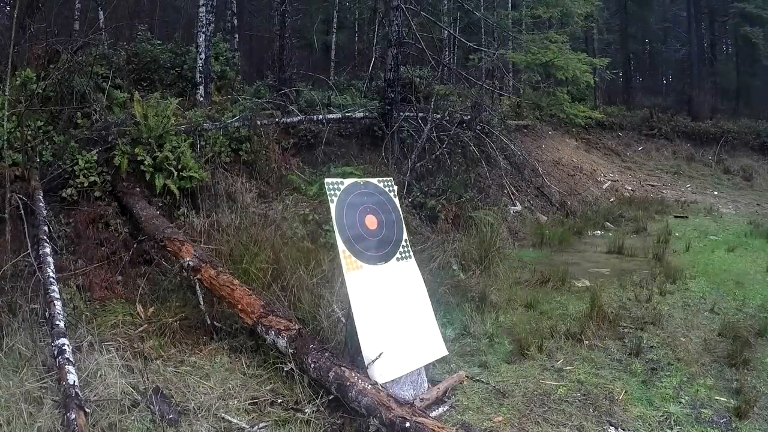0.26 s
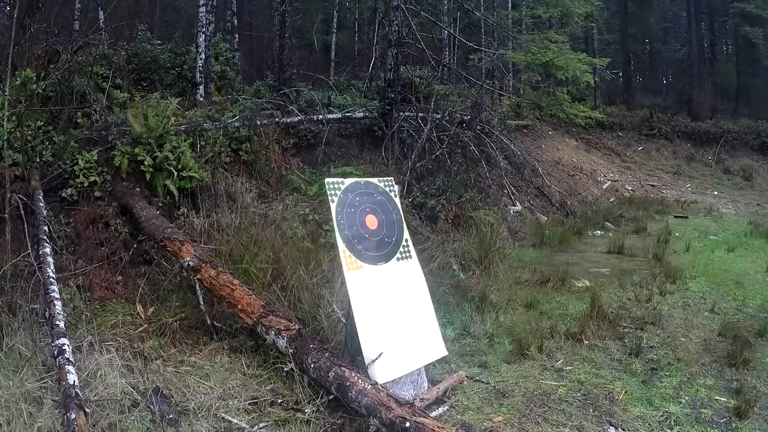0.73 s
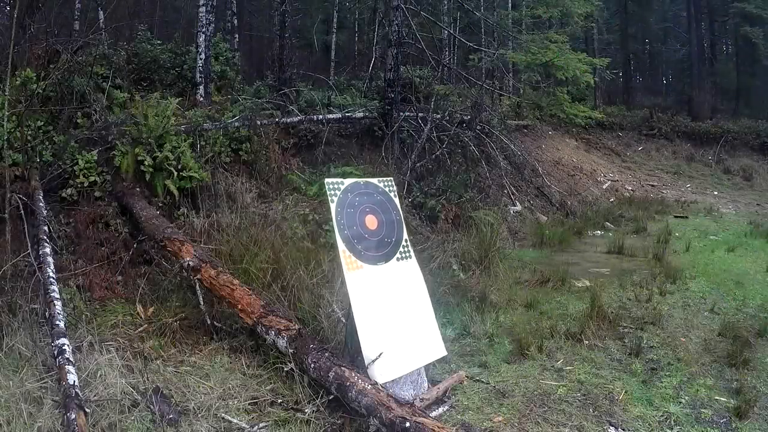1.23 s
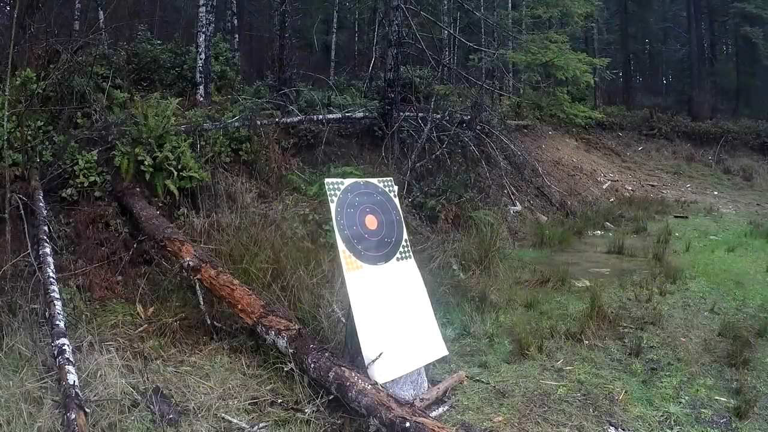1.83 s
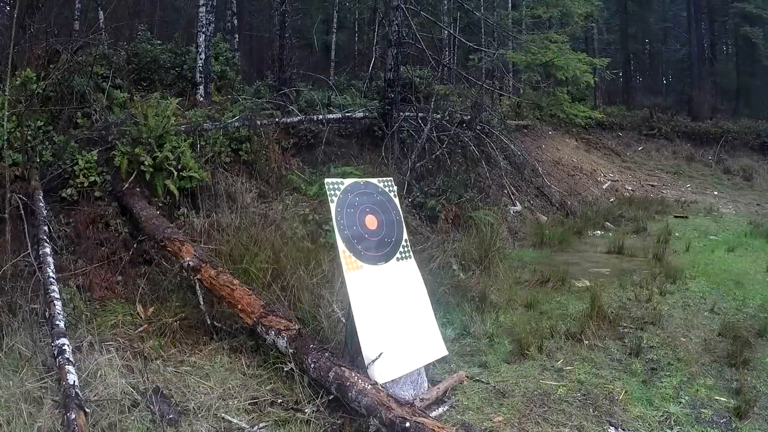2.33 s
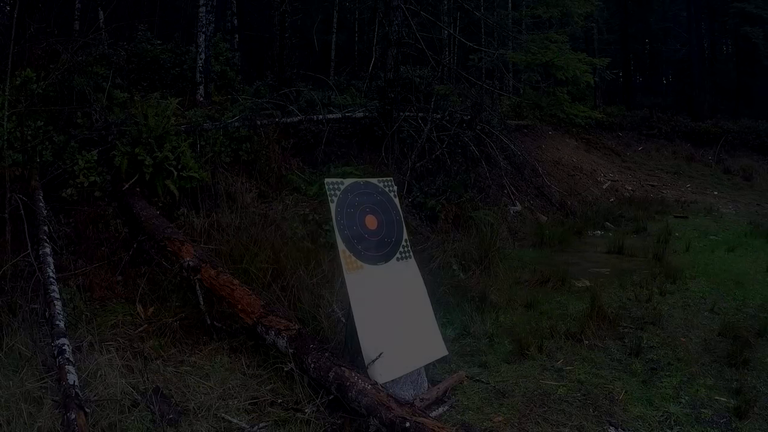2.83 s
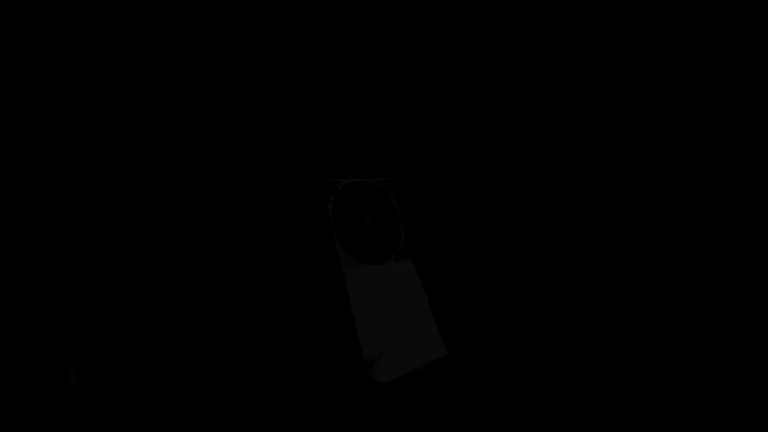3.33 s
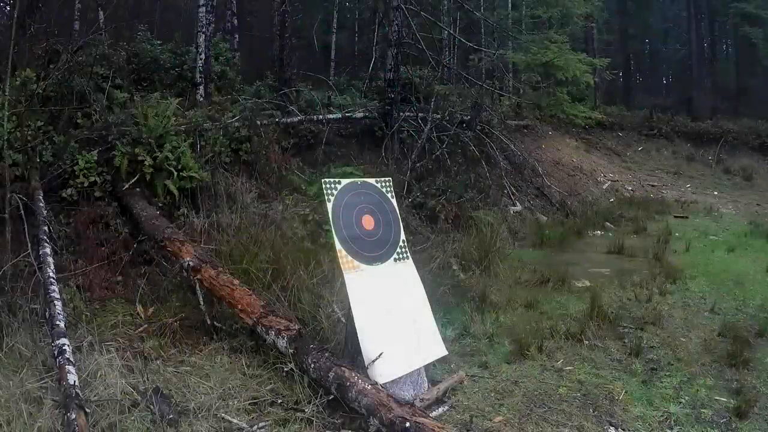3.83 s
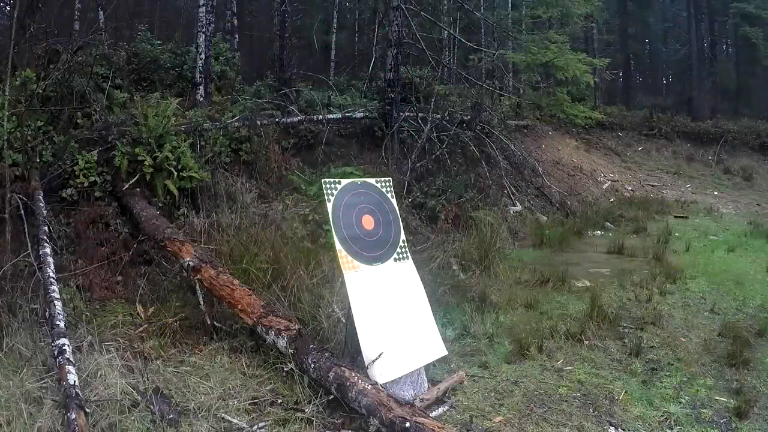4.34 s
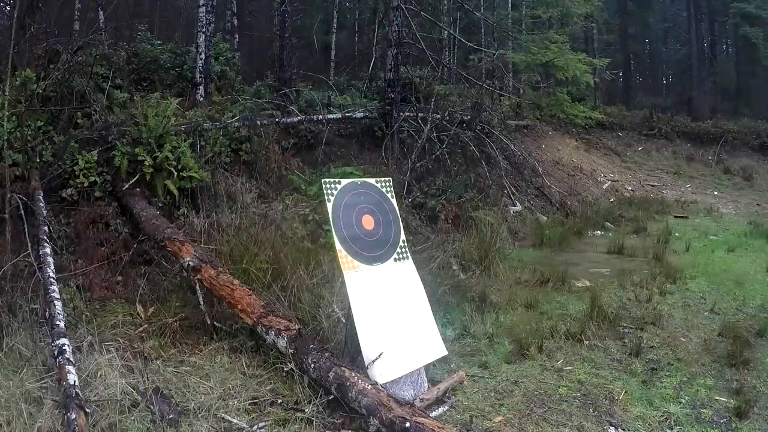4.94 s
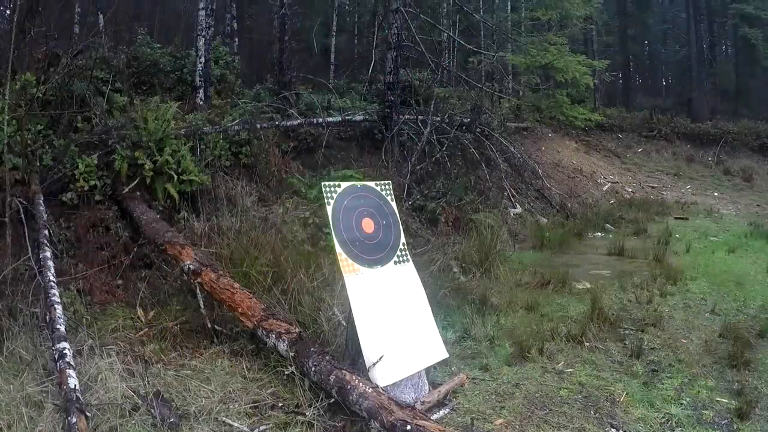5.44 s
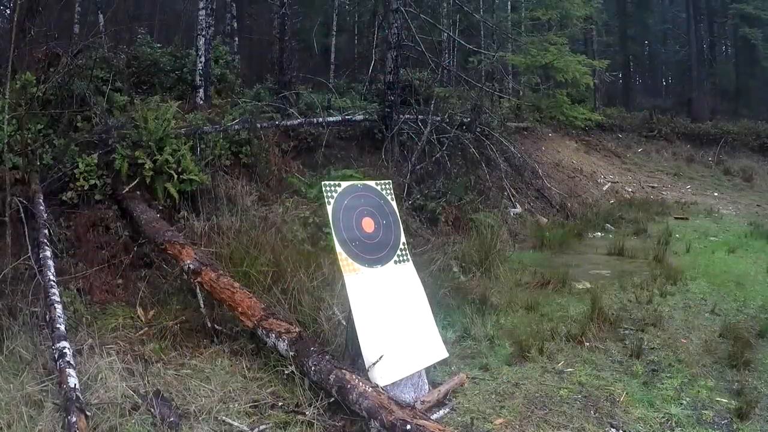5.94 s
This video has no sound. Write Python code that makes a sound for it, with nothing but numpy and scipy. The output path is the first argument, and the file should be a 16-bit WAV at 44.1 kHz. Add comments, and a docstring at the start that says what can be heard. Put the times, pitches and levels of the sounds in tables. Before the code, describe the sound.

Two hard, distorted shotgun blasts sound about five seconds apart in a clearing among trees. Each has a crack, a ground thump and brief knocks and slaps, followed by a wash of echo from the far woods. The first echo stops suddenly midway, leaving soft rain hiss and scattered nearby drips until the second shot. Wind rumbles faintly on the microphone throughout.

```python
"""Shotgun blasts in a wet clearing

Two blasts overload a small microphone, with a muzzle crack, a ground thump, a knock on a board and
brief slaps. Ground and near trunks reflect them at once; the far woods scatter back a long echo
that air absorption dulls. Light rain hisses and drips, and wind rumbles on the microphone.
Midway the first echo stops abruptly and the rain grows louder."""
import sys
import numpy as np
from scipy import signal
from scipy.fft import rfft, irfft
from scipy.io import wavfile
from scipy.ndimage import uniform_filter1d

SR = 44100
rng = np.random.default_rng(int(sys.argv[2]) if len(sys.argv) > 2 else 0)


def transcribe(u):
    """Save the signal u as a 16-bit wav file named by the first command-line argument.

    u: samples, shape (n,) or (channels, n), limited to [-1, 1]; the rate is SR.
    q: integer samples, one column per channel.
    """
    v = np.clip(np.atleast_2d(u).T, -1, 1)
    q = np.round(v * 32767).astype(np.int16)
    wavfile.write(sys.argv[1], SR, q)


N = 272097
T = np.arange(N) / SR
ECHO_CUT_S = 3.243

# Muzzle blasts: t/s, level/dB, start of first long swing/s, growth factor of swings, 60 dB decay time/s
BLASTS = [(.4849, 19, .0019, 2.2, .052), (5.3747, 21, .0018, 2.3, .055)]
# After each blast: ground gain/dB, clearing's edge gain/dB, edge fade factor, spray hold/s, rain dip/dB
AFTERMATH = [(1.5, -1, 1.08, 0.052, 5), (-5.5, -2, 1.12, 0.092, 15)]


def blast(db, first_swing, growth, t60):
    """Pressure transient: the front rings out in a damped oscillation of ever slower swings."""
    t = np.arange(1, SR // 8) / SR
    phase = np.pi * np.log(t / first_swing) / np.log(growth)
    return -amp(db - 60 * t / t60) * np.sin(phase)


def sharp_burst(db, hz, width, length):
    """Band-limited transient: a short burst of noise, heard as a crack, thump, knock or slap."""
    t = np.arange(2000) / SR
    burst = rng.standard_normal(len(t)) * np.exp(-(t / length) ** 3)
    band = resonate(resonate(burst, hz, width), hz, 2 * width)
    return amp(db) * band * np.sqrt(SR / (2 * np.pi * width))


def near_echo(fired, ground_db, edge_db, fade_factor, spray_hold):
    """Diffuse reflection: ground, bank and first trunks return boom and crackle, leaves a thin spray."""
    # Spectra of the three bands: f/Hz, relative density/dB
    boom_spectrum = [(30, 0), (70, -7), (130, -3), (220, -3), (310, -2.5), (400, 0.5), (520, -10.5),
                     (750, -10.5), (1100, -13), (3000, -61)]
    crackle_spectrum = [(400, -46.5), (700, 4), (1000, -3.5), (1400, -4), (3000, -4), (5600, -8),
                        (8000, -22), (11000, -45)]
    spray_spectrum = [(3000, -30), (6000, 2.5), (8000, 6.5), (11000, 5), (15400, -6), (16500, -28)]
    # A row per band: base level/dB and base fade/(dB/s) for ground, clearing's edge and tail in turn
    decays = [(1.5, 895, -5.5, 200, -34, 26), (-9.5, 699, -11, 221, -24, 47),
              (-24, 297, -32, 398, -46.5, 90)]
    ground_s, edge_s, rise_s, release_s = 0.0082, 0.038, 0.012, 0.3
    t = T - fired
    rise = np.clip((t - edge_s) / rise_s + 1, 0, 1) ** 2
    envelopes = []
    for row, hold in zip(decays, (0, 0, spray_hold)):
        ground, ground_fade, edge, edge_fade, tail, tail_fade = row
        age = fade_factor * np.maximum(t - edge_s - hold, 0)
        from_ground = amp(ground_db + ground - ground_fade * np.maximum(t - ground_s, 0))
        from_edge = amp(edge - edge_fade * age) + amp(tail - tail_fade * age)
        envelopes.append(from_ground + rise * amp(edge_db) * from_edge)
    boom = envelopes[0] * coloured_noise(boom_spectrum, 200, 900)
    crackle = envelopes[1] * coloured_noise(crackle_spectrum, 1500, 6000)
    spray = envelopes[2] * coloured_noise(spray_spectrum, 8000, 14000)
    returns = (t > ground_s) * (boom + air_absorption(crackle, fired) + spray)
    release_db = 150 * np.maximum(t - release_s, 0)
    return returns * amp(1.33 * flicker(0.00066) - release_db)


def far_echo(shot, fired):
    """Scattering: countless far trunks spread the blast into a rolling wash."""
    # Spectrum before absorption: f/Hz, relative density/dB
    spectrum = [(20, 1), (60, -8), (150, -0.5), (350, 2), (500, 1), (700, -1), (1000, 1.5), (1400, -3),
                (2500, -3), (4000, -4.5), (7000, -10), (16000, -19.5)]
    # Contour of the roll, one list per blast: t/s, level before absorption/dB
    contours = [
        [(.66, -31), (.78, -33), (.9, -29), (.97, -30.5), (1.01, -27.5), (1.74, -24.5), (2.05, -26.5),
         (2.6, -32), (3.2, -35.5)],
        [(5.56, -35.5), (5.655, -39.5), (5.7, -33), (6.17, -29.5)],
    ]
    times, level_db = np.transpose(contours[shot])
    roll = air_absorption(coloured_noise(spectrum, 200, 2000), fired)
    grain_db = 0.22 * flicker(0.002) + 0.65 * flicker(0.053)  # single trunks stand out
    rise = np.clip((T - fired) / (times[0] - fired), 0, 1)
    return amp(np.interp(T, times, level_db) + grain_db) * rise * roll


def air_absorption(x, fired):
    """Atmospheric absorption: the loss grows with frequency and with travel time since the shot."""
    hz, t, spectra = signal.stft(x, SR, nperseg=256, noverlap=192)
    db_per_s = 15 * (hz[:, None] / 4000) ** 1.52
    loss_db = db_per_s * np.maximum(t - fired, 0)
    return signal.istft(spectra / amp(loss_db), SR, nperseg=256, noverlap=192)[1][:N]


def drip(db, hz):
    """Impact excitation: a sharp splash drives a damped resonance; low drops plop, high ones tick."""
    splash_cycles = 1.74
    damping = 0.45 * (hz / 1000) ** 0.47
    t = np.arange(500) / SR
    splash = rng.standard_normal(len(t)) * np.exp(-t * hz / splash_cycles)
    splash[0] += 2.5  # first contact
    body = resonate(resonate(splash, hz, damping * hz), 1.15 * hz, 1.3 * hz)
    return amp(db) * body / abs(body).max()


def patter():
    """Shot noise: small drops fall at random on eight resonances; a few are large, bright ones faint."""
    drops_per_s = 300
    sizes = amp(6.2 * np.minimum(rng.exponential(1, N), 3))
    impacts = sizes * (rng.random(N) < drops_per_s / SR)
    band = rng.integers(0, 8, N)
    return sum(resonate(resonate(impacts * (band == k), hz, 0.87 * hz), hz, 0.87 * hz) / hz ** 1.7
               for k, hz in enumerate(np.geomspace(1300, 8000, 8)))


def rain():
    """Incoherent summation: rain merges into a hiss with patter on top; both sink after each blast."""
    # Spectrum of the hiss: f/Hz, relative density/dB
    spectrum = [(71, -38), (120, 1.5), (157, -5), (261, -10.5), (463, -7), (684, -5.5), (1260, -10),
                (4140, -19), (14200, -35), (15000, -31), (16000, -62)]
    hiss = coloured_noise(spectrum, 9000, 12500) * amp(1.2 * flicker(0.012))
    drops = amp(4.5 + 8.3 * (T > ECHO_CUT_S)) * unit_rms(patter())
    gain_db = np.where(T > ECHO_CUT_S, -66, -69)
    for (fired, *_), (*_, dip_db) in zip(BLASTS, AFTERMATH):
        gain_db = gain_db - dip_db * np.interp(T - fired, [0.2, 0.45, 0.85, 1.3], [0, 1, 1, 0])
    return amp(gain_db) * (hiss + drops)


def wind():
    """Turbulence: gusts press unevenly on the microphone and make it rumble."""
    # Spectrum of the rumble: f/Hz, relative density/dB
    spectrum = [(8.8, -28), (15, -4), (43, -2.5), (65, -7.5), (92, -6.5), (114, -30), (145, -43),
                (250, -54.5), (320, -55), (550, -120)]
    # Gust contour: t/s, level/dB
    gusts = [(0.0, -39), (0.31, -44), (0.65, -46), (0.86, -39.5), (1.65, -55), (1.91, -43.5), (2.63, -46.5),
             (3.11, -44), (3.52, -38), (4.54, -41), (4.64, -40.5), (4.91, -39.5), (5.14, -41), (5.4, -39),
             (5.82, -42), (6.17, -51)]
    rumble = coloured_noise(spectrum, 20, 90)
    return amp(np.interp(T, *np.transpose(gusts)) + 2.1 * flicker(0.03)) * rumble


def amp(db):
    """Decibel law: the amplitude ratio of a level."""
    return 10 ** (np.asarray(db) / 20)


def unit_rms(x):
    """Normalisation to a mean power of 1."""
    return x / np.sqrt(np.mean(x ** 2) + 1e-20)


def coloured_noise(spectrum, low_hz, high_hz):
    """Spectral shaping of white noise, to rms 1 between low_hz and high_hz."""
    corners, db = np.transpose(spectrum)
    hz = np.fft.rfftfreq(N, 1 / SR)
    gain = amp(np.interp(np.log(hz + 1), np.log(corners), db))
    band = (hz > low_hz) & (hz < high_hz)
    return irfft(rfft(rng.standard_normal(N)) * gain, N) / np.sqrt(np.mean(band * gain ** 2))


def flicker(seconds):
    """Low-pass noise: a smooth random fluctuation on the given time scale."""
    size = max(round(seconds * SR), 1)
    return unit_rms(uniform_filter1d(uniform_filter1d(rng.standard_normal(N), size), size))


def resonate(x, hz, width):
    """Damped resonance with a bandwidth in Hz and a peak gain near 1 when narrow."""
    pole = np.exp((2j * np.pi * hz - np.pi * width) / SR)
    return 2 * signal.lfilter([1 - abs(pole)], [1, -pole], x).real


def add(mix, start_s, sound):
    """Superposition of a delayed sound on the mix."""
    part = mix[round(start_s * SR):][:len(sound)]
    part += sound[:len(part)]


def scene():
    """Linear superposition: blasts, bursts, echoes and weather sum at one point."""
    # Short sharp bursts at and just after each shot (muzzle crack, ground thump, a knock on the
    # board and brief slaps): t/s, level/dB, f/Hz, bandwidth/Hz, length/s
    bursts = [(.485, 14, 1640, 1170, 0.0036), (.494, 0.5, 477, 412, 0.0064),
              (.5217, -5.5, 2770, 3500, 0.012), (.553, -20, 2000, 3000, 0.0066),
              (5.3748, 19.5, 1720, 1280, 0.00256), (5.384, 5, 526, 500, 0.0093),
              (5.412, -10, 880, 900, 0.019), (5.4428, 17, 2850, 910, 0.0025),
              (5.451, -10.5, 2950, 2000, 0.013), (5.505, -24.5, 4000, 4000, 0.016)]
    # The nearest drops: t/s, peak level/dB, f/Hz
    drops = [(.2783, -38, 3000), (0.3264, -38.5, 1353), (2.915, -36, 3500), (3.1513, -39, 4500),
             (3.262, -29, 1560), (3.2924, -30, 2220), (3.318, -29, 2500), (3.3592, -26, 1500),
             (3.425, -29, 9980), (3.463, -34, 5260), (3.5472, -30.5, 1430), (3.5844, -25, 5000),
             (3.6217, -33, 5110), (3.8437, -34, 2040), (4.0107, -32, 1610), (4.108, -28.5, 3240),
             (3.7916, -36, 9500), (3.8277, -37, 2800), (3.8722, -37, 8500), (3.925, -33, 10000),
             (4.163, -31, 9000), (4.227, -31.5, 1150), (4.253, -29, 5120), (4.2719, -24, 9000),
             (4.281, -30, 8000), (4.2924, -35, 1280), (4.444, -32, 1120), (4.463, -33, 3600),
             (4.571, -30.5, 2740), (4.591, -30, 1000), (4.6173, -29, 1230), (4.6806, -26.5, 1740),
             (4.641, -36, 10500), (4.7447, -35, 6230), (4.8074, -26, 3000), (4.8385, -36, 5400),
             (4.9038, -33, 8000), (4.994, -37, 3800), (5.012, -32.5, 1420), (5.0515, -29, 9000),
             (5.1089, -24.5, 4500), (5.1277, -27, 9000), (5.299, -19, 1320)]
    # Brief dips in weather and far echo: deepest point t/s, fall/s, recovery/s
    dips = [(0.483, 0.024, 0.003), (3.245, 0.0097, 0.0047), (5.378, 0.025, .002)]
    mix, near = rain() + wind(), np.zeros(N)
    for start, db, hz in drops:
        add(mix, start, drip(db, hz))
    for shot, ((fired, *_), (*reflection, _)) in enumerate(zip(BLASTS, AFTERMATH)):
        audible = (T < ECHO_CUT_S) == (fired < ECHO_CUT_S)
        mix += far_echo(shot, fired) * audible
        near += near_echo(fired, *reflection)
    for deepest, fall, recovery in dips:
        mix *= np.interp(T, [deepest - fall, deepest, deepest + recovery], [1, 0.03, 1])
    mix += near
    for table, source in (BLASTS, blast), (bursts, sharp_burst):
        for start, *settings in table:
            add(mix, start, source(*settings))
    return mix[None]


def record(dry):
    """Saturation: the overloaded microphone clips hard, then a low-pass limits the bandwidth."""
    clipped = np.clip(dry, -1, 1)
    low_pass = signal.firwin(255, cutoff=15600, window=("kaiser", 8), fs=SR)
    return signal.oaconvolve(clipped, low_pass[None], "same")


dry = scene()
out = record(dry)
transcribe(out)
```